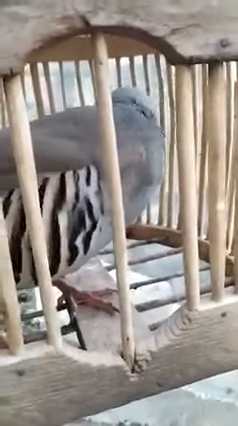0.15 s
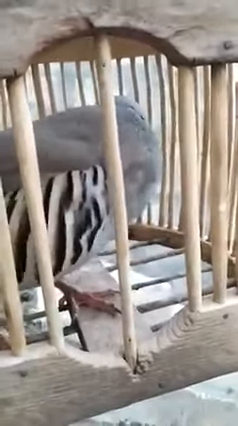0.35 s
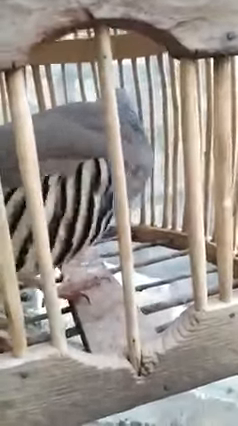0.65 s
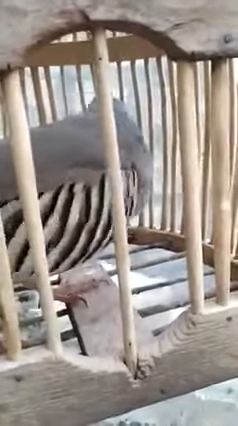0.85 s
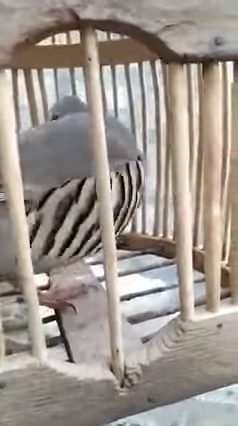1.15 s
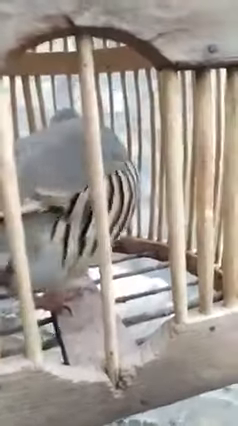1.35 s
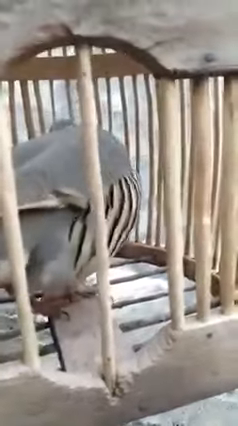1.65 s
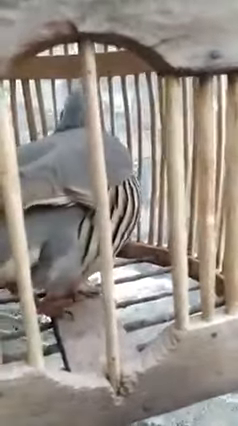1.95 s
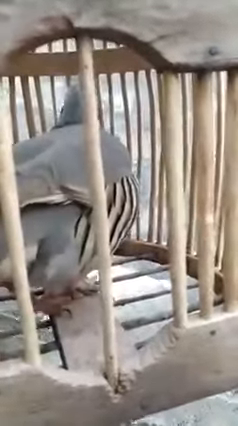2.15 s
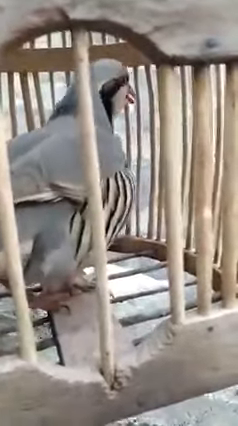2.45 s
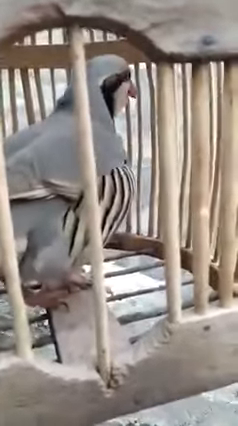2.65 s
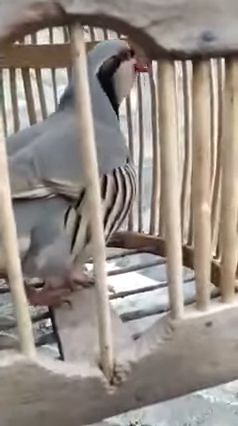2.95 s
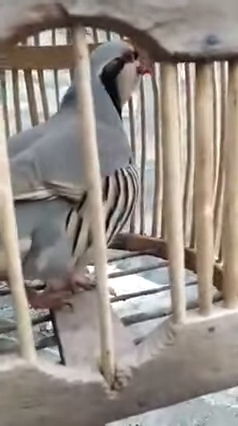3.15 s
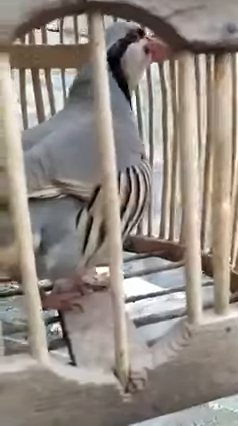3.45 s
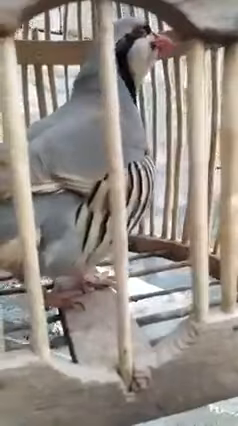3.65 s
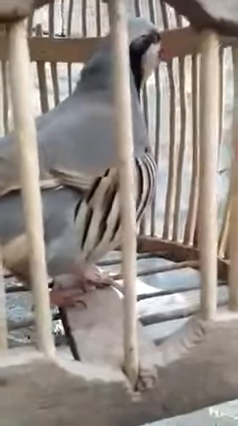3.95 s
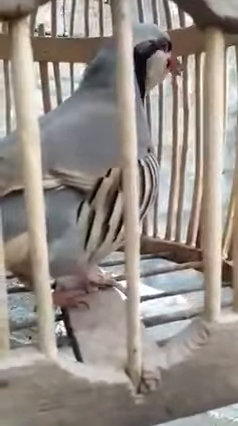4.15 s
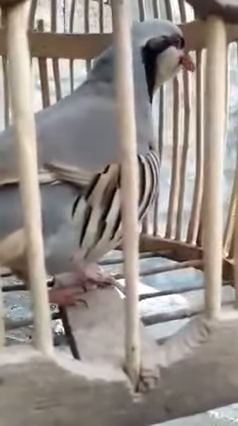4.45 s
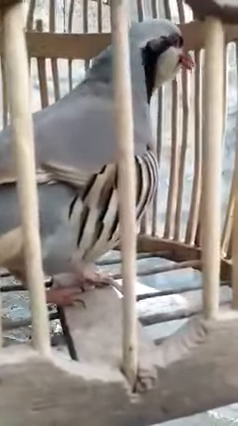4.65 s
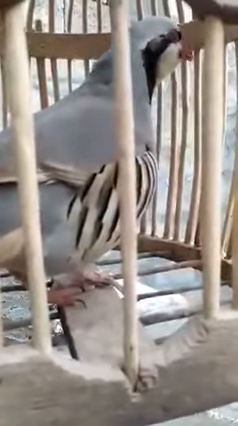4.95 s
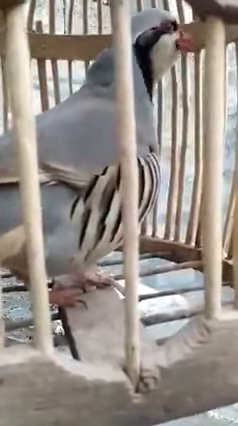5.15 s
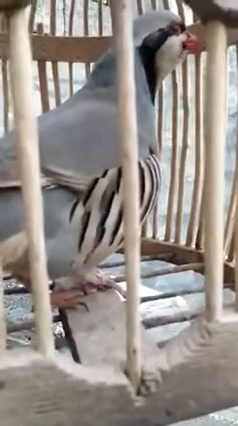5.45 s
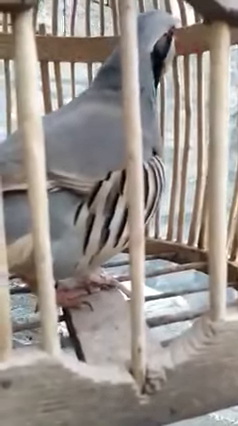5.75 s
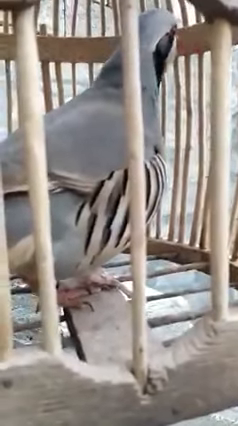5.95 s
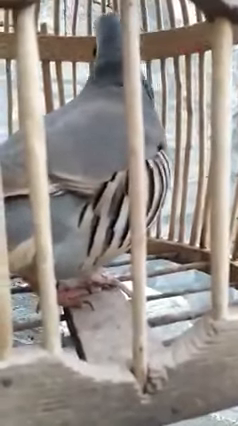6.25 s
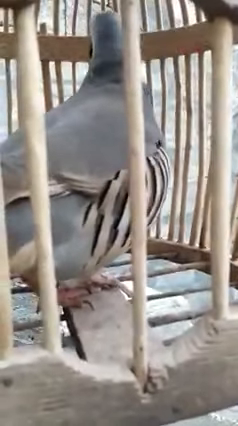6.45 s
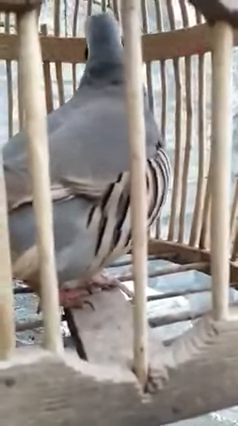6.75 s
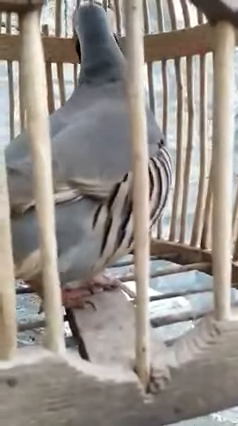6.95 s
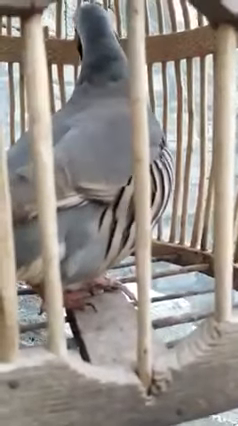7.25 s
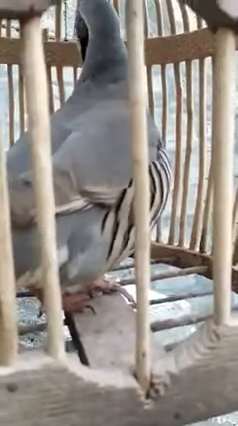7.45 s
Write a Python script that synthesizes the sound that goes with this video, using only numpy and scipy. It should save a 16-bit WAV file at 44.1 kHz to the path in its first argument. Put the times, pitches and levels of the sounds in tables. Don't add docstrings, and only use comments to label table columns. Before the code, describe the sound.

A quiet walled yard with a soft, low outdoor hush, heard very close to a caged partridge through a phone's microphones. From 0 to 1.5 s a second partridge, further off to the left, gives short hoarse notes. The near bird adds faint, dark clucks from about 0.35 s; claws tick dryly on the bars at 0.6 s and lightly at 1.3 s. From 1.5 to 2.6 s the clucks grow louder, quicker and brighter. From 2.65 s they turn into a harsh three-note figure: hard short note, rounder short note, longer swelling rasp. After some irregular extra notes it settles near 4 s into full-strength groups every half second until 7.5 s. At 3.5 s a brief low gust thumps past with a little hiss. The far bird returns around 3.7 s, clearer and stronger from 4.5 s, overlapping the near calls. Short echoes come off cage and walls.

```python
import sys
import numpy as np
from scipy import signal
from scipy.io import wavfile
from scipy.ndimage import uniform_filter1d, map_coordinates

SR = 44100
rng = np.random.default_rng(int(sys.argv[2]) if len(sys.argv) > 2 else 0)


def voltage_ratio(decibels):
    exponent = np.asarray(decibels, float) / 20
    return 10 ** exponent


def dump(signal):
    limited = np.clip(np.atleast_2d(signal).T, -1, 1)
    pcm = np.round(limited * 32767).astype(np.int16)
    wavfile.write(sys.argv[1], SR, pcm)


N = 335160


def evened(x):
    return x / np.sqrt(np.mean(x ** 2) + 1e-20)


def read(points, hz):
    f, value = np.transpose(points)
    return np.interp(np.log(hz + 1), np.log(f + 1), value)


def track(points, s):
    times, *columns = np.transpose(points)
    return [np.interp(s, times, column) for column in columns]


def add(mix, s, sound):
    part = mix[..., max(round(s * SR), 0):][..., :sound.shape[-1]]
    part += sound[..., :part.shape[-1]]


def resonate(x, hz, width):
    turn = np.exp(2j * np.pi * np.cumsum(hz * np.ones(len(x))) / SR)
    r = np.exp(-np.pi * width / SR)
    smooth = signal.lfilter([(1 - r) ** 2], [1, -2 * r, r * r], x / turn)
    return 2 * (turn * smooth).real


def modes(x, table, tuning):
    total = 0
    for k, (hz, width, db) in enumerate(table):
        total = total + (-1) ** k * voltage_ratio(db) * resonate(x, hz * tuning, width) / np.sqrt(width)
    return evened(total)


def slow(chance, hz):
    return evened(signal.lfilter(*signal.butter(2, hz, fs=SR), chance))


def delayed(x, samples):
    return map_coordinates(x, [np.arange(N) - samples], order=3)


def shaped(s, length, effort_db, crest, onset_db, end_db):
    crest_s = min(crest * length, length - .01)
    return s, crest_s, length, effort_db + onset_db, effort_db, effort_db + end_db


def syrinx(row, pitch_hz, rough, jitter, sag, sag_s, flutter_db):
    s, crest, length, onset_db, peak_db, end_db = row
    attack, release = .008, .022
    t = np.arange(0, length + release, 1 / SR)
    wander, flutter, hiss = rng.standard_normal((3, 8000))[:, :len(t)]
    knots = np.maximum.accumulate([0, attack, max(crest, attack + .001), length - .004, length + release])
    effort_db = np.interp(t, knots, [onset_db - 15.5, onset_db, peak_db, end_db, end_db - 19.0])
    to_end = t - length - release
    effort_db -= 30 * np.clip(to_end / .005 + 1, 0, 1) ** 2
    climb = .2 * np.exp(-t / (.2 * length))
    glide = 1 - climb - sag * np.clip((to_end + sag_s) / sag_s, 0, 1) ** 1.6
    turns = np.cumsum(pitch_hz * glide * (1 + jitter * slow(wander, 90))) / SR
    pulses = sum(np.cos(2 * np.pi * k * turns) for k in range(1, 26))
    puffs = (0.91 + np.exp(-(turns % 1) / 0.4)) * hiss
    rough = np.clip(rough, 0, 1)
    drive = (1 - rough) * evened(pulses) + rough * evened(puffs)
    return effort_db, glide, turns, drive * voltage_ratio(flutter_db * slow(flutter, 100.0))


# start [t/s], length [t/s], effort [level/dB], pitch [f/Hz],
# chest against throat [level/dB]; first the soft clucks
CLUCKS = [(.347, 0.029, -40, 484, 5.5), (.747, 0.024, -39, 461.5, 9), (1.124, .032, -40, 454, 12.5),
          (1.224, .03, -45.5, 531, 10), (1.274, 0.021, -36, 567, -3.5), (1.496, 0.04, -27, 482.4, -10.5),
          (1.675, 0.029, -17, 411.8, -18.5), (1.77, .05, -27.5, 400.3, -4.5),
          (1.992, .043, -24, 494, -13.5), (2.135, 0.06, -21.5, 500.4, -12),
          (2.292, 0.048, -14.5, 526, -15.5), (2.457, 0.057, -16.5, 439.6, -13.5)]
CHUKS = [(2.651, 0.052, -11, 493, -17), (3.116, 0.044, -10, 487.4, -18.5), (3.253, 0.054, -8, 435, -17),
         (4.072, 0.04, -5.5, 483, -19), (4.555, 0.04, -7, 480.4, -15.5), (5.054, 0.041, -7, 490, -15.5),
         (5.547, 0.045, -6, 539.7, -15), (6.041, 0.04, -6, 483.5, -17), (6.549, 0.043, -5.5, 506, -13.5),
         (7.046, .042, -4.5, 504.3, -15), (7.549, 0.047, -4, 487, -13.5)]
KAS = [(2.8, 0.047, -17.5, 395.6, -10), (3.353, 0.04, -8, 467, -14.5), (3.72, 0.04, -7, 453, -15.5),
       (4.215, 0.044, -8, 489, -13), (4.701, 0.045, -9, 497.3, -11.5), (5.206, 0.045, -10.5, 493.4, -10),
       (5.696, 0.053, -7.5, 496.4, -11), (6.192, 0.051, -10, 506, -7), (6.692, .054, -8.5, 520, -6.5),
       (7.194, 0.061, -8, 514, -7)]
KARS = [(2.912, 0.097, -10.5, 483, -12.5), (3.523, 0.081, -7.5, 447, -16.5),
        (3.835, 0.1, -11.5, 451.7, -12.5), (4.33, 0.092, -10, 494, -10.5), (4.814, 0.1, -9.5, 485.2, -12),
        (5.318, 0.099, -11, 525, -7), (5.812, 0.091, -10, 508.3, -7), (6.308, 0.1, -13, 501, -3.5),
        (6.811, 0.1, -9.5, 507.3, -5.5), (7.322, 0.083, -7, 516, -6)]
# crest [share of length], onset [level/dB], end [level/dB], throat [f/Hz],
# beak [level/dB]
CLUCK = (-1.2, -6.5, -2, 1375, -5.5)
CHUK = (1.7, -6, -13.5, 1412.5, -11.5)
KA = (0.7, -11.5, -16.5, 1315, -8)
KAR = (3.7, -15.5, -15, 1338, -6.5)
# time [t/s], opening [0-1], tuning of the middle modes [factor],
# aim at the ports [level/dB]
GAPE = [(.3, .45, 0.56, 4), (1.2, 0.36, 1.23, 7), (1.6, 0, 1.3, 5.5), (2.2, 0.28, 1.29, -10.5),
        (2.7, 0.38, 1.027, 0.5), (3.1, 0.7, 1.03, 2.5), (3.7, 0.6, 1.008, 6.5), (4.1, 0.7, 0.98, 2.5),
        (5.6, 0.93, 0.89, 3.5), (6.3, 0.94, 0.97, -0.5), (7.6, 0.86, 0.92, 4)]


def near_notes():
    kinds = [(CLUCKS, CLUCK), (CHUKS, CHUK), (KAS, KA), (KARS, KAR)]
    notes = sorted((*row, *kind) for rows, kind in kinds for row in rows)
    whims_db = 4 * rng.standard_normal((len(notes), 2))
    for note, (high_whim, top_whim) in zip(notes, whims_db):
        s, length, effort_db, pitch_hz, chest_db, crest, onset_db, end_db, throat_hz, beak_db = note
        opening, tuning, aim_db = track(GAPE, s)
        shut = 1 - opening
        gape = tuning, -5 + 22.5 * shut, -5 + aim_db + high_whim, -2.5 + aim_db + top_whim
        voice = pitch_hz, throat_hz, chest_db, beak_db - 18.5 * shut
        yield shaped(s, length, effort_db, crest, onset_db, end_db), voice, gape


# time [t/s], pitch sag [share], sag length [t/s], fundamental [level/dB],
# roughness [0-1]
MANNER = [(0, 0.45, 0.02, -49, 0.5), (1.6, 0.54, 0.046, -7.5, 0.59), (2.5, 0.71, 0.056, -9, 0.79),
          (3.5, 0.46, 0.043, -4.5, 0.68), (4.5, 0.49, .038, 1, 0.74), (7.6, 0.41, 0.035, -4, 0.48)]
# time [t/s], depth [level/dB]
BREAK_DB = [(0, 2.5), (1.6, 5), (4.9, 4.5), (5.6, 2)]
# centre [f/Hz], width [f/Hz], level [level/dB]
BEAK = [(2347, 770, 0), (3860, 760, -1.5), (4764, 530, 6.5), (6250, 660, -15.5), (7340, 690, -5),
        (9150, 1000, -19.5), (11740, 1500, -22.5)]
# time [t/s], lag of the left port [samples], throat at left [level/dB],
# beak at left [level/dB]
HEAD = [(0, 7, -1, 0), (1.8, 7, -1, -1), (2.6, 10, -9, -5), (3.7, 9.5, -12, -6), (5, 11, -8, -5),
        (6.1, 11, -8, -5), (6.3, 14.5, -4, -4), (7.6, 14, -5, -4)]


def near_bird():
    chest, throat, beak = np.zeros((3, N))
    for row, (pitch_hz, throat_hz, chest_db, beak_db), gape in near_notes():
        s, peak_db = row[0], row[4]
        sag, sag_s, first_db, rough = track(MANNER, s)
        effort_db, glide, turns, drive = syrinx(row, pitch_hz, rough, jitter=.022, sag=sag, sag_s=sag_s,
                                                flutter_db=2.5)
        late = np.linspace(0, 1, len(turns))
        break_db = np.interp(s, *np.transpose(BREAK_DB))
        breaks = voltage_ratio(break_db * slow(rng.standard_normal(8000), 45)[-len(turns):])
        locked = np.clip(np.arange(len(turns)) / SR / .018, .1, 1) ** 2
        partials = voltage_ratio(first_db + 2.5 * (late - 4.5)) * np.cos(2 * np.pi * turns)
        partials += glide ** 4 * breaks * np.cos(4 * np.pi * turns)
        breathy = evened(resonate(drive, 1.75 * pitch_hz * glide, 220)) * np.clip(1.05 - 1.3 * late, .15, 1)
        voiced = evened(locked * evened(partials) + .8 * breathy)
        slack_db = np.clip(peak_db - effort_db, 0, 16)
        add(chest, s, voltage_ratio(effort_db + 0.76 * slack_db + chest_db - 3.0) * voiced)
        ring = resonate(drive, throat_hz * glide ** .1 * (1 + 0.086 * (.5 - late)), 270)
        hoarse = evened(evened(ring) - 0.083 * evened(resonate(drive, 1838, 510)))
        add(throat, s, voltage_ratio(effort_db - 3.0) * hoarse)
        tuning, low_db, high_db, top_db = gape
        factors = [1, tuning, tuning, tuning, tuning ** .5, 1, tuning ** .5]
        gains_db = [low_db, 30 * (1 - tuning), 0, 0, high_db, high_db, top_db]
        tract = [(hz * k, w, db + g) for (hz, w, db), k, g in zip(BEAK, factors, gains_db)]
        add(beak, s, voltage_ratio(effort_db + .35 * slack_db + beak_db - 1.0) * modes(drive, tract, glide ** 0.17))
    lag, throat_db, beak_db = track(HEAD, np.arange(N) / SR)
    shaded = signal.lfilter(*signal.butter(3, 5800, fs=SR), beak)
    left = delayed(voltage_ratio(-1.0) * chest + voltage_ratio(beak_db) * shaded, lag)
    left += voltage_ratio(throat_db) * delayed(throat, lag - 4)
    return np.array([left, chest + throat + beak])


# start [t/s], length [t/s], effort [level/dB], crest [share of length]
FAR = [(0, 0.018, -33.5, .3), (0.081, .052, -36, .7), (0.288, 0.046, -34, .6), (0.341, .065, -31.5, .45),
       (0.591, 0.11, -35, .6), (0.925, .098, -33.5, .4), (1.402, 0.087, -34, .3), (2.532, .023, -40.5, .3),
       (3.04, 0.095, -51.5, .35), (3.44, .073, -43, .8), (3.674, 0.0344, -33.5, .7), (3.793, 0.03, -35, .3),
       (4.276, 0.027, -32, .35), (4.518, 0.022, -24, .7), (4.625, 0.065, -25.5, .8), (4.938, 0.15, -55, .7),
       (5.165, .059, -21, .8), (5.607, .043, -30, .2), (5.773, .032, -16, .45), (5.949, 0.063, -17.5, .15),
       (6.152, .06, -19.5, .25), (6.415, 0.04, -18, .45), (6.604, 0.029, -22, .45), (6.916, 0.042, -21, .3),
       (7.096, 0.036, -26, .3), (7.426, 0.057, -21, .45)]
# time [t/s], pitch [f/Hz], beak [level/dB], roughness [0-1]
FAR_VOICE = [(0, 357, -2, .55), (1.5, 357, -2, .55), (2.5, 390, -11, .4), (3.7, 392, -14, .17),
             (4.4, 430, -12, .2), (5.7, 500, -15, .14), (7.6, 500, -15, .16)]
# centre [f/Hz], width [f/Hz], level [level/dB]
FAR_THROAT = [(740, 167, -5.5), (1208, 193, 0), (1560, 120, 8)]
# centre [f/Hz], width [f/Hz], level [level/dB]
FAR_BEAK = [(2260, 233, -0.5), (2696, 350, -2.5), (3430, 1900, -1), (6420, 930, -13.5),
            (9200, 11000, -14.5)]


def far_bird():
    out = np.zeros(N)
    for note in FAR:
        row = shaped(*note, onset_db=-8, end_db=-9)
        pitch_hz, beak_db, rough = track(FAR_VOICE, row[0])
        effort_db, glide, turns, drive = syrinx(row, pitch_hz, rough, jitter=.015, sag=.3, sag_s=.08,
                                                flutter_db=2.6)
        tilted = [(hz, w, db + beak_db * hz / 4000) for hz, w, db in FAR_BEAK]
        voice = modes(drive, FAR_THROAT, glide ** 0.56) + voltage_ratio(beak_db) * modes(drive, tilted, glide ** 0.56)
        add(out, row[0], voltage_ratio(effort_db - 1.0) * evened(voice))
    return np.array([out, voltage_ratio(1.0) * delayed(out, 9.9)])


# time [t/s], peak [level/dB], ring [f/Hz]
CLAWS = [
    (0.577, -53.5, 3900),
    (0.626, -37, 4240),
    (0.638, -52, 4260),
    (1.309, -46.5, 3550),
]


def claws():
    out, t = np.zeros(N), np.arange(600) / SR
    for s, db, hz in CLAWS:
        tick = rng.standard_normal(600) * voltage_ratio(-60 * t / 0.014)
        ring = evened(resonate(tick, hz, 1100)) * voltage_ratio(-60 * t / 0.024)
        add(out, s, voltage_ratio(db - 0.5) * (tick + 0.46 * ring))
    return np.array([out, delayed(out, -2.0)])


# band [f/Hz], t60 [t/s]
YARD = [(300, 0.3), (1400, 0.28), (3000, 0.22), (6000, 0.24), (9000, 0.21)]
# band [f/Hz], t60 [t/s]
CAGE = [(300, 0.074), (1400, 0.096), (4000, 0.074), (9000, 0.034)]


def echo(x, decays, first):
    taps = np.zeros((2, SR // 2))
    slots = np.arange(first, SR // 2 - 20, 20)
    at = slots + rng.integers(0, 20, (2, len(slots)))
    np.put_along_axis(taps, at, rng.choice([-1., 1.], at.shape), 1)
    hz, t, z = signal.stft(taps, SR, nperseg=256)
    tail = signal.istft(z * voltage_ratio(-60 * t / read(decays, hz)[:, None]), SR, nperseg=256)[1]
    return signal.fftconvolve(x[None], tail / np.linalg.norm(tail[0]), axes=1)[:, :N]


# frequency [f/Hz], density [level/dB]
FLOOR = [(15, -53), (25, -8.5), (82, -7), (448, -14.5), (2700, -21), (7420, -31.5), (12600, -41.5),
         (14000, -44)]


def floor():
    frames, hz = N // 256 + 5, np.fft.rfftfreq(1024, 1 / SR)
    a, b, c, d, patches = rng.standard_normal((frames, 513, 5)).T
    patches_db = 2 * evened(uniform_filter1d(uniform_filter1d(patches, 7, 0), 18, 1))
    same = np.clip(read([(60, 0.47), (250, 1.0), (1000, 0.17)], hz), 0, 1)[:, None]
    left = a + 1j * b
    z = np.array([left, same * left + np.sqrt(1 - same ** 2) * (c + 1j * d)])
    z = z * voltage_ratio(read(FLOOR, hz)[:, None] + patches_db)
    return voltage_ratio(-60.5 + 2.0) * evened(signal.istft(z, nperseg=1024, noverlap=768)[1][:, :N])


def gust():
    crest_s, crest_db, rise_db_s, fall_db_s = 3.52, -35, 223, 110
    lumps = rng.standard_normal((2, N))
    rumble = .6 * evened(resonate(lumps[0], 50, 30))
    rumble += 1.2 * evened(resonate(lumps[1], 105, 41))
    rumble += 0.48 * evened(resonate(lumps[1], 230, 200))
    since = np.arange(N) / SR - crest_s
    gust_db = crest_db + np.minimum(rise_db_s * since, -fall_db_s * since)
    hiss = voltage_ratio(crest_db - 10 - (since / .008 + 2.8) ** 2) * evened(resonate(lumps[0], 1000, 4500))
    return voltage_ratio(gust_db) * evened(rumble) * voltage_ratio([[-1.2], [1.2]]) + hiss


def scene():
    near, far = near_bird(), far_bird()
    yard = echo(voltage_ratio(-16.0) * near[1] + voltage_ratio(-12.5) * far[0], YARD, 300)
    cage = echo(voltage_ratio(-9) * near[1] + voltage_ratio(-6) * far[0], CAGE, 40)
    no_bass = signal.butter(6, 230, "high", fs=SR, output="sos")
    birds = signal.sosfilt(no_bass, near + far + yard + voltage_ratio(-3) * cage)
    return birds + claws() + floor() + gust()


# frequency [f/Hz], offset [level/dB]
MASK = [(1500, -40), (2300, -24), (3000, -10), (6000, -7), (8000, -1), (12000, 0)]


def thinned(x):
    hz, t, z = signal.stft(x, SR, nperseg=2048, noverlap=1536)
    power = abs(z) ** 2
    level_db = 20 * np.log10(abs(z) + 1e-12)
    near_db = 10 * np.log10(abs(uniform_filter1d(power, 110, 1)) + 1e-24)
    band_db = 10 * np.log10(abs(uniform_filter1d(power, 12, 1)) + 1e-24)
    whim = evened(uniform_filter1d(rng.standard_normal((len(t), 65, 2)), 5, 0))
    whim = whim.T.repeat(16, 1)[:, :len(hz)]
    line_db = near_db + read(MASK, hz)[:, None] + 6 * whim
    valley = band_db < near_db - 7 - 11 * (hz[:, None] < 2700) + 2.5 * whim
    emptied = valley & (hz[:, None] > 1600)
    return signal.istft(z * (level_db > line_db) * ~emptied, SR, nperseg=2048, noverlap=1536)[1][:, :N]


# frequency [f/Hz], rms [level/dB]
FILL = [(8436, -74), (8990, -79), (9189, -72), (9938, -71), (10686, -81), (11440, -74), (12188, -81),
        (12936, -84)]


def fill_tones(x):
    band = signal.butter(4, [3000, 8000], "band", fs=SR, output="sos")
    bright = signal.sosfilt(band, x)
    level = np.sqrt(abs(uniform_filter1d(bright ** 2, 2600, axis=1, origin=700)))
    level = level / np.sqrt(np.mean(level[1, N // 2:] ** 2))
    t = np.arange(N) / SR
    tones = np.zeros(N)
    for chance, (hz, db) in zip(rng.standard_normal((len(FILL), N)), FILL):
        gate = uniform_filter1d(1. * (slow(chance, 6) > -.2), 200)
        tones += voltage_ratio(db + 7) * gate * np.sin(2 * np.pi * hz * t)
    return level * tones * (t > 3.2) * voltage_ratio([[-4], [3]])


def top_cut(x):
    return signal.sosfilt(signal.butter(12, 14480, fs=SR, output="sos"), x)


def record(dry):
    kept = thinned(np.tanh(dry))
    return top_cut(kept + fill_tones(kept))


dry = scene()
out = record(dry)
dump(out)
```